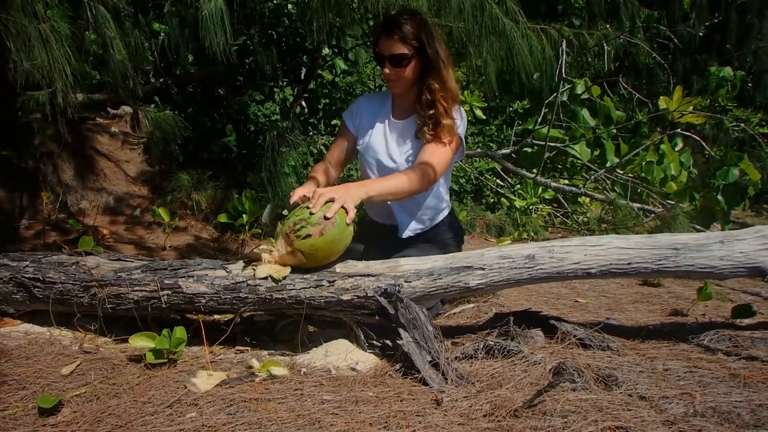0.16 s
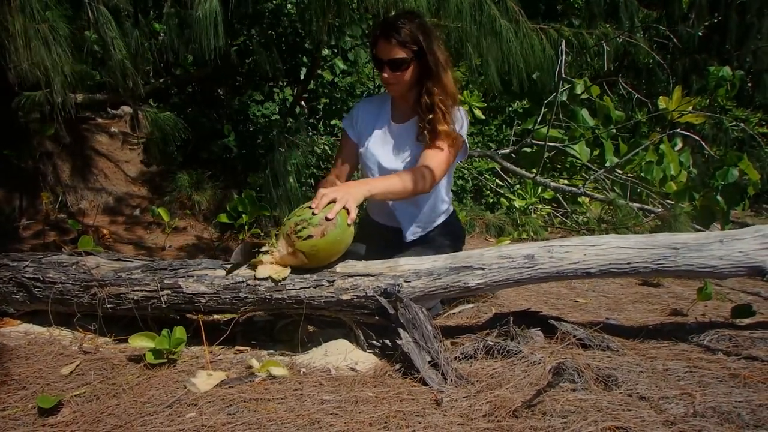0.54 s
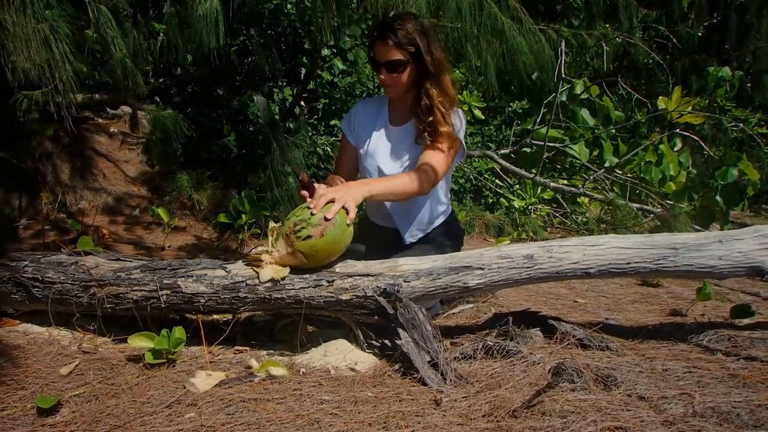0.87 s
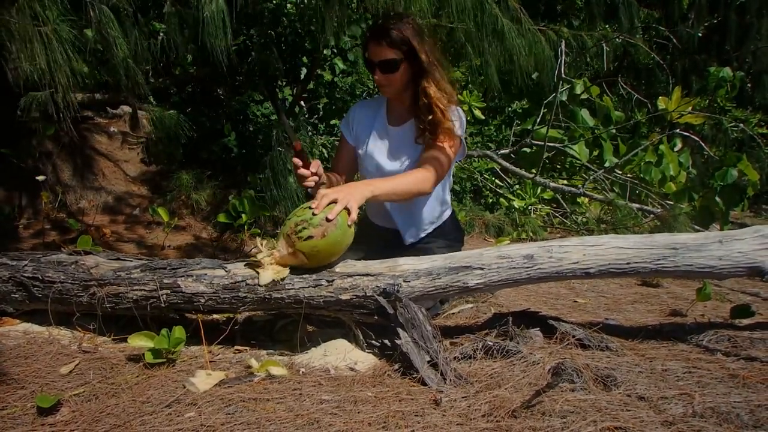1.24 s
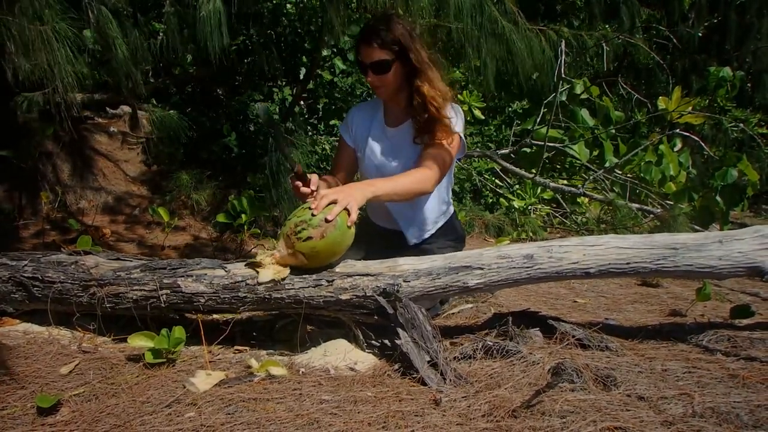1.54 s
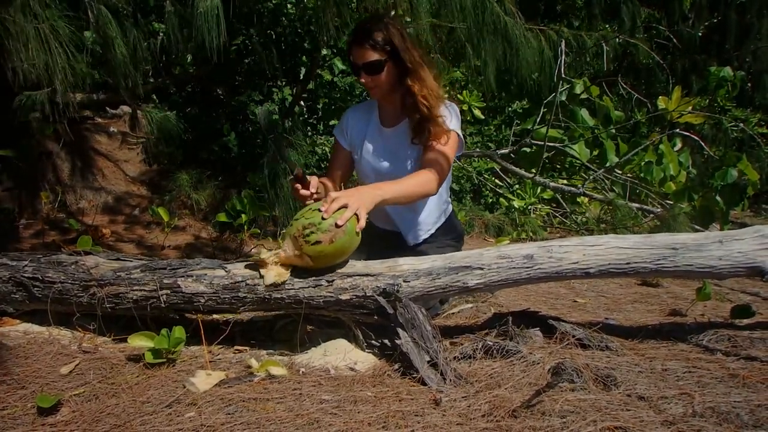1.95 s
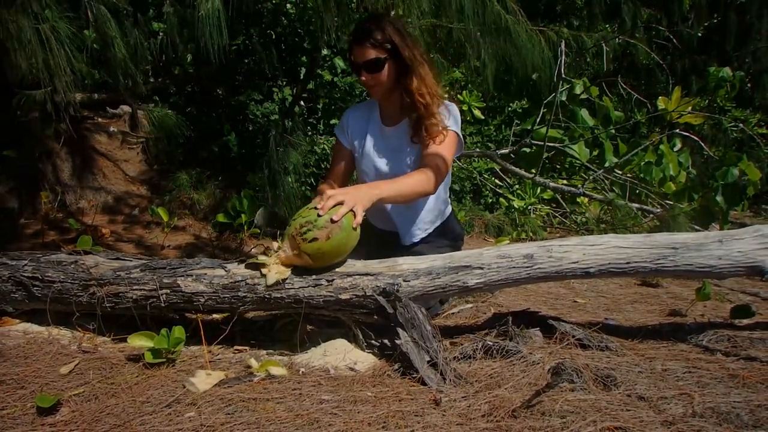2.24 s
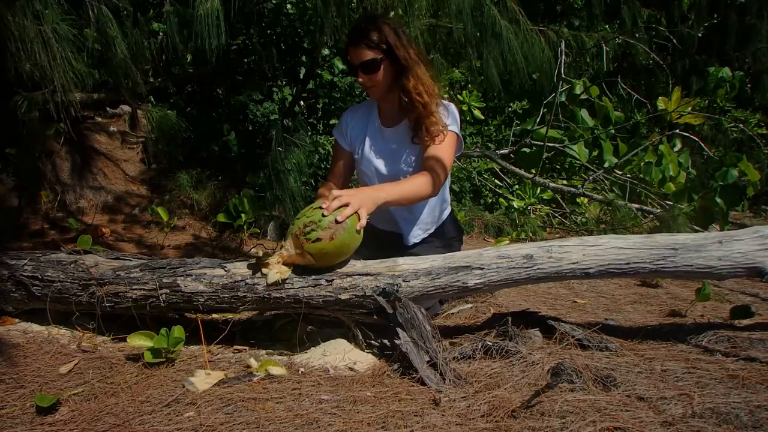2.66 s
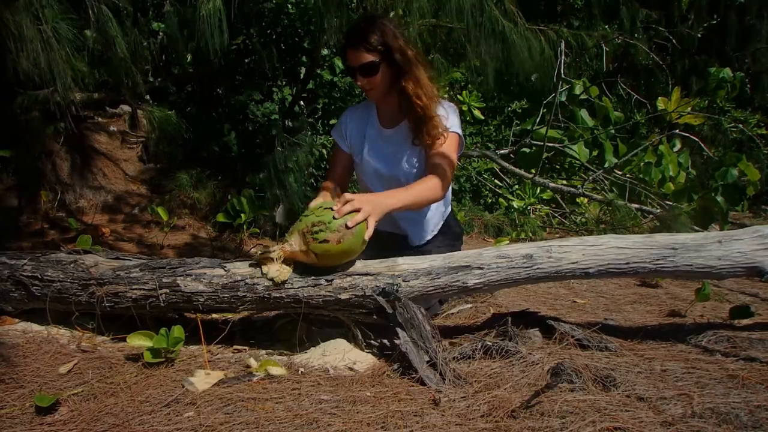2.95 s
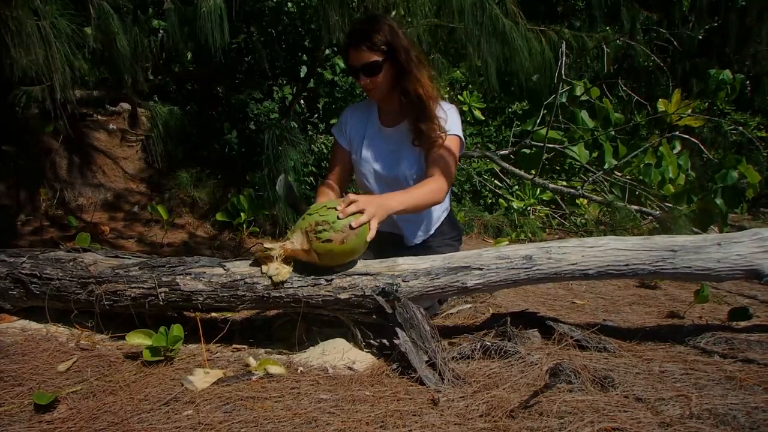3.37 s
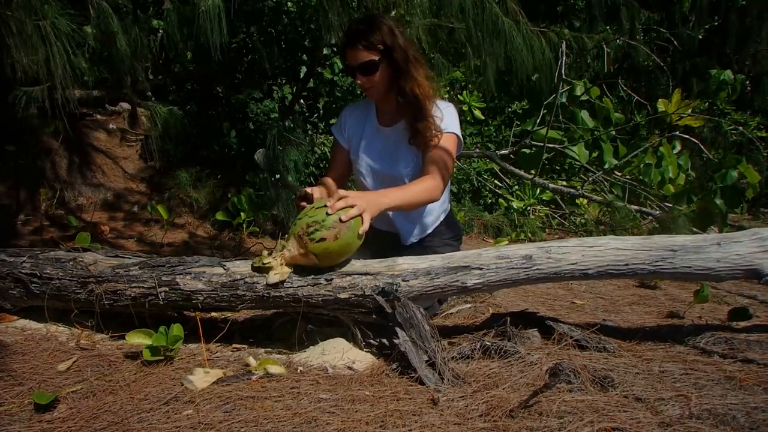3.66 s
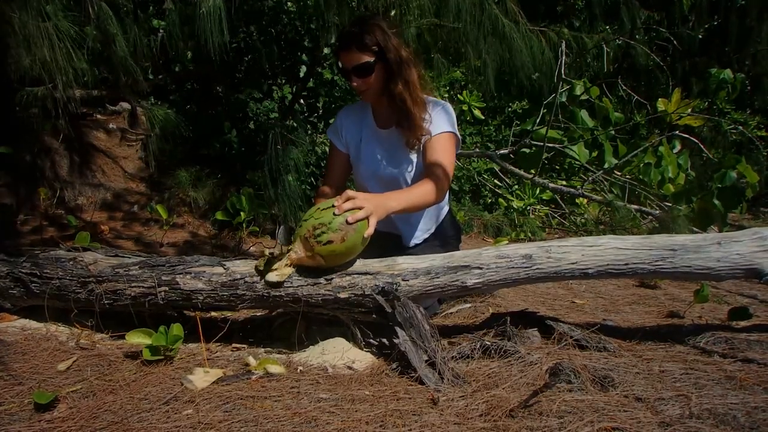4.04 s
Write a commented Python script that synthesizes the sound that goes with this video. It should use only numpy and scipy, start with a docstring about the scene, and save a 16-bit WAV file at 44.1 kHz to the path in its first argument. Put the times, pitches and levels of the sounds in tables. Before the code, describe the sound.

A blade chops the husk of a green coconut lying on a log, a few metres away and slightly right of centre, outdoors on a beach. Each blow is a short woody knock joined to a wet crackle of tearing fibres and a brief high hiss of juice. Seven blows fall at about 0.05, 0.6, 1.0, 1.4, 1.8, 2.2 and 2.6 seconds, the one at 1.0 strongest and juiciest. In the pause that follows, a separate sharp tick sounds at 3.2 seconds. Two more firm chops land at 3.5 and 4.0 seconds. Throughout, distant surf makes a soft, wide wash that dips after each blow and creeps back, with a faint, steady, high insect chorus. Wind buffets the microphone with low, uneven rumbles and soft thumps, most noticeably around 0.6, 1.3 and 3.2 seconds.

```python
"""A blade chops the husk of a green coconut lying on a log, a few metres from a camera on a beach.
From the start, surf washes and insects sing far off while wind buffets the two microphones.
Seven blows fall in the first 2.6 s; each knocks the nut, rips wet fibres and lets juice hiss out.
A separate sharp tick sounds in the pause, at 3.24 s; two more blows follow at 3.5 and 4.0 s.
The camera notches five narrow bands throughout; its gain control ducks the surf after each blow."""
import sys
import numpy as np
from scipy import signal
from scipy.io import wavfile
from scipy.ndimage import uniform_filter1d

SR = 44100
rng = np.random.default_rng(int(sys.argv[2]) if len(sys.argv) > 2 else 0)


def inscribe(sig):
    """Save sig as 16-bit PCM at rate SR to the path in sys.argv[1].

    A 1-D sig is mono; a 2-D sig holds one channel per row.
    Samples are clipped to [-1, 1] before scaling.
    """
    pcm = np.round(np.clip(np.atleast_2d(sig).T, -1, 1) * 32767)
    wavfile.write(sys.argv[1], SR, pcm.astype(np.int16))


N = 185301
BINS_HZ = np.fft.rfftfreq(4096, 1 / SR)
TOP_HZ, CUTOFF_HZ = 15750, 16600


def gain_of(db):
    """Decibels to amplitude factor."""
    return 10 ** (np.asarray(db) / 20)


def unit_rms(x):
    """Scale to rms 1."""
    return x / np.sqrt(np.mean(x ** 2) + 1e-20)


def curve_at(points, hz):
    """Interpolate a table over log frequency."""
    points_hz, values = np.transpose(points)
    return np.interp(np.log(hz + 1), np.log(points_hz + 1), values)


def add(mix, start_s, sound):
    """Mix a sound in at start_s."""
    part = mix[..., round(start_s * SR):][..., :sound.shape[-1]]
    part += sound[..., :part.shape[-1]]


def pan_gains(pan_db):
    """Channel gains; pan is left minus right."""
    return gain_of(np.array([pan_db / 2, -pan_db / 2]))


def min_phase(db):
    """Minimum-phase impulse response for gains on BINS_HZ."""
    log_gain = np.log(gain_of(np.maximum(np.r_[db, db[-2:0:-1]], -100)))
    return np.fft.ifft(np.exp(np.conj(signal.hilbert(log_gain)))).real[:2048]


def tinted(x, db):
    """Colour x with a unit-energy filter."""
    colour = min_phase(db)
    return signal.oaconvolve(x, colour / np.linalg.norm(colour))[:len(x)]


def wander(shape, samples):
    """Smooth random drift, rms 1."""
    return unit_rms(uniform_filter1d(uniform_filter1d(rng.standard_normal(shape), samples), samples))


def stereo_noise(shape_db, correlation, patchy_db, size=1024):
    """Shaped noise with drifting spectral patches, rms 1; correlation is a number or a table."""
    frames, hz = 4 * N // size + 5, np.fft.rfftfreq(size, 1 / SR)
    left_re, left_im, other_re, other_im, patches = rng.standard_normal((frames, len(hz), 5)).T
    patches = unit_rms(uniform_filter1d(uniform_filter1d(patches, 9, axis=0), 9, axis=1))
    shared = correlation if np.isscalar(correlation) else curve_at(correlation, hz)[:, None]
    left, other = left_re + 1j * left_im, other_re + 1j * other_im
    spectra = np.array([left, shared * left + np.sqrt(1 - shared ** 2) * other])
    spectra *= gain_of(shape_db(hz)[..., None] + patchy_db * patches)
    return unit_rms(signal.istft(spectra, nperseg=size, noverlap=3 * size // 4)[1][:, :N])


def insects(centre_hz=3230, width_hz=260, level_db=-65.5):
    """Far chorus: a steady narrow band of noise."""
    def band_db(hz):
        return -6 * (2 * (hz - centre_hz) / width_hz) ** 4
    return gain_of(level_db) * stereo_noise(band_db, correlation=0.58, patchy_db=1.8)


# Surf spectrum: (frequency [Hz], density [dB])
SURF_SPECTRUM = [(24, -46), (40, -30), (96, -2.5), (179, -10), (248, -11.5), (352, -2.5), (691, -3.5),
                 (1580, -7.5), (3020, -10.5), (3250, -15.5), (3970, -16), (8200, -18.5), (15700, -34)]
# Surf left-right likeness: (frequency [Hz], correlation [ratio])
SURF_CORRELATION = [(60, 0.11), (130, 0.069), (290, 0.93), (640, 0.94), (1410, 0.91), (3100, 0.85),
                    (6820, 0.46), (15000, 0.21)]
# Surf balance: (frequency [Hz], pan [dB])
SURF_PAN = [(100, 1), (700, -1.5), (4400, -0.5), (8000, 1.5), (15000, -0.7)]
# Surf swell: (time [s], level [dB])
SURF_SWELL = [(0, -40), (.3, -39.5), (.6, -42.5), (.9, -45), (1.199, -43.5), (1.5, -42.5), (1.8, -44),
              (2.1, -46.5), (2.4, -46.5), (2.7, -43.5), (3.0, -43), (3.3, -45), (3.602, -42.5),
              (3.9, -42.5), (4.2, -43.5)]


def surf():
    """Far, wide wash that swells slowly."""
    def shape_db(hz):
        pan_db = np.outer([.5, -.5], curve_at(SURF_PAN, hz))
        treble_bump_db = 6.8 * (abs(hz - 12800) < 120)
        return curve_at(SURF_SPECTRUM, hz) + pan_db + treble_bump_db - 90 * (hz > TOP_HZ)
    wash = stereo_noise(shape_db, SURF_CORRELATION, patchy_db=1.95)
    return wash * gain_of(np.interp(np.arange(N) / SR, *np.transpose(SURF_SWELL)))


# Turbulence spectrum: (frequency [Hz], density [dB])
WIND_SPECTRUM = [(30, -31), (70, -18.5), (140, 3), (250, -1), (450, -7), (900, -21), (3000, -44)]
# Gust envelope: (time [s], level [dB])
WIND_GUSTS = [(0.0, -46.5), (0.15, -53), (0.2, -42), (0.42, -44.5), (0.55, -44.5), (0.63, -46),
              (0.82, -41.5), (1.02, -54), (1.1, -42), (1.18, -49.5), (1.33, -38.5), (1.48, -41.5),
              (1.53, -54), (1.79, -40.5), (1.83, -55.5), (2.45, -51.5), (2.67, -48), (2.71, -41),
              (2.8, -40.5), (2.84, -53), (3.08, -56), (3.141, -35.5), (3.18, -36.5), (3.29, -46),
              (3.45, -41), (3.61, -48), (3.85, -49.5), (4.0, -57.5), (4.2, -64)]
# Single eddies: (centre time [s], level [dB], frequency [Hz], pan [dB])
WIND_EDDIES = [(0.206, -32, 206, -32), (.392, -32, 264, -25), (0.48, -42, 218, 9), (0.488, -34.5, 206, -27),
               (.543, -36.5, 250, 17), (0.584, -27, 250, 4), (0.645, -27, 283, 4), (0.743, -35, 199, 11),
               (0.782, -30, 325, 15), (1.091, -35, 160, -4), (1.301, -23, 326, -6), (1.324, -38, 340, 16),
               (1.354, -29.5, 274, -21.5), (1.36, -22, 264, -1), (1.479, -28.5, 265, -13),
               (2.753, -32, 220, -20), (2.790, -28, 199, -12), (3.143, -25.5, 348, 15),
               (3.151, -27.5, 187, 2), (3.152, -26, 265, 1), (3.213, -25, 267, -10),
               (3.328, -36.5, 253, -21), (3.412, -39, 230, 22)]


def wind(mean_pan_db=-3, veer_db=7, lump_db=3.87):
    """Turbulence on the microphones: lumpy rumble and soft thumps of single eddies."""
    balance = pan_gains(mean_pan_db + veer_db * wander(N, samples=2500))
    gust_db = np.interp(np.arange(N) / SR, *np.transpose(WIND_GUSTS))
    envelope = gain_of(gust_db + lump_db * wander((2, N), samples=500))
    rumble = stereo_noise(lambda hz: curve_at(WIND_SPECTRUM, hz), correlation=0.55, patchy_db=2.2)
    out = rumble * envelope * balance
    for centre_s, level_db, hz, pan_db in WIND_EDDIES:
        cycles = np.arange(0, 2.2, hz / SR)
        thump = gain_of(level_db) * np.sin(2 * np.pi * cycles) * np.hanning(len(cycles))
        add(out, centre_s - len(cycles) / 2 / SR, np.outer(pan_gains(pan_db), thump))
    return out


# Juice hiss spectrum: (frequency [Hz], density [dB])
JUICE_SPECTRUM = [(2000, -8), (5000, -8), (8300, -3.5), (10500, -12), (15500, -42)]


def spray(level_db, rise_s=0.00097, t60_s=0.24):
    """Juice leaves the cut with a smooth high hiss."""
    t = np.arange(9000) / SR
    hiss = tinted(rng.standard_normal(len(t)), curve_at(JUICE_SPECTRUM, BINS_HZ))
    return gain_of(level_db - 60 * t / t60_s) * (1 - np.exp(-t / rise_s)) * hiss


# Fibre snap spectrum: (frequency [Hz], density [dB])
FIBRE_SPECTRUM = [(180, -40), (300, -3.5), (1000, 3), (1380, 2), (1830, 0), (3530, -1.5), (5640, -2),
                  (10500, -11), (15200, -33), (16500, -40)]


def rip(level_db, rise_ms, t60_s, tilt_db_per_oct, crest_factor=3):
    """Wet fibres of uneven size snap: a dense crackle swells, darkens and dies."""
    t = np.arange(6000) / SR
    snaps = rng.standard_normal(len(t)) * gain_of(3.3 * np.minimum(rng.exponential(1, len(t)), 4))
    envelope = (1 - np.exp(-1000 * t / rise_ms)) * gain_of(-60 * t / t60_s)
    envelope /= envelope.max()
    colour_db = curve_at(FIBRE_SPECTRUM, BINS_HZ) + tilt_db_per_oct * np.log2((BINS_HZ + 200) / 4000)
    crackle = tinted(unit_rms(snaps) * envelope, colour_db)
    dull = uniform_filter1d(crackle, size=3)
    sound = dull + (crackle - dull) * 3.07 * gain_of(-25 * t / t60_s)  # finest snaps stop first
    sound *= np.linalg.norm(envelope) / np.linalg.norm(sound)  # rms near 1 at the envelope's top
    return gain_of(level_db) * sound / crest_factor


# Modes of nut and log: (frequency [Hz], level [dB], base t60 [s])
NUT_MODES = [(261, 3.5, 0.12), (506.4, 2, 0.059), (884, -9.5, 0.075), (1011.6, 0.1, 0.034),
             (1222, -3, 0.02), (1440, -30, 0.028), (1892, -0.5, 0.034), (2274, -5, 0.048),
             (3520, -1, 0.016), (3790, 3.5, 0.019), (4010, -13, 0.046), (5800, -7, .025)]


def knock(level_db, spot_hz, falloff_db, ring_scale, contact_cycles=0.24, feed_cycles=0.66):
    """The blade's half-sine push rings the modes; the struck spot favours those near spot_hz."""
    t = np.arange(4000) / SR
    ring = np.zeros(len(t))
    for hz, mode_db, t60_s in NUT_MODES:
        loss_db = min(falloff_db * np.log2(hz / spot_hz) ** 2, 20.5)
        ring += gain_of(mode_db - loss_db - 60 * t / (t60_s * ring_scale)) * np.sin(2 * np.pi * hz * t)
    ring *= 1 - 0.91 * np.exp(-t * spot_hz / feed_cycles)  # the wedging blade feeds the ring
    ring[0] = 1.0  # direct blade contact
    push = np.sin(np.pi * np.clip(t[:100] * spot_hz / contact_cycles, 0, 1))
    sound = np.convolve(np.diff(push, prepend=0), ring)[:len(t)]  # the change of force radiates
    return -gain_of(level_db) * sound / abs(sound).max()  # pressure drops first


# Scatter off the camera body: (frequency [Hz], side re mid [dB])
SCATTER_SPECTRUM = [(500, -26), (3000, -14.5), (5500, -14), (8500, -6.5), (13000, -0.5)]


def body_scatter(mid):
    """The camera body scatters treble unevenly to the two microphones, anew for each sound."""
    echoes = rng.standard_normal(300) * np.exp(-np.arange(300) / 210)
    response = np.convolve(echoes / np.linalg.norm(echoes), min_phase(curve_at(SCATTER_SPECTRUM, BINS_HZ)))
    side = signal.oaconvolve(mid, response)[:len(mid)]
    return mid + np.outer([1, -1], side)


# Blows on the nut, and one separate sharp tick at 3.24 s:
# (time [s], level [dB], spot frequency [Hz], falloff [dB/oct^2], ring scale [ratio])
IMPACTS = [(.0447, -14.5, 760, 7.5, 0.4), (.0520, -18, 910, 2, 0.34), (.5640, -13, 930, 9.5, 0.76),
           (.9781, -10, 724, 3.5, 0.42), (.9996, -6, 1770, 42, 0.33), (1.3933, -12.5, 910, 6.5, 0.65),
           (1.4100, -19, 1030, 11, 0.85), (1.7812, -10.5, 803, 10, 0.4), (2.1826, -16, 715, 6, 0.44),
           (2.1968, -25.5, 1080, 20, 0.8), (2.2455, -26.5, 1680, 8, 0.31), (2.5827, -11.5, 1134, 43, 0.89),
           (3.2398, -10, 4180, 5, 0.33), (3.4588, -9, 1135, 21, 0.75), (4.0055, -9, 2080, 23, 0.72),
           (4.0062, -16.5, 646, 9, 0.45)]
# Husk tearing, and the tick's brief crackle: (time [s], level [dB], rise [ms], t60 [s], tilt [dB/oct])
CRACKLES = [(.0447, -12, .4, 0.051, 5.5), (.0510, -8, 1.3, 0.052, 0.6), (.0615, -16, 1.2, 0.054, 0.5),
            (.5634, -8, 2.1, 0.023, 1.5), (.5720, -25, 1.2, 0.051, 6), (.9785, -19, 0.48, 0.046, -0.5),
            (.9830, -19, .6, 0.02, 4), (.9900, -10, 6.1, 0.057, -0.8), (.9996, -7, 0.18, 0.033, 0.8),
            (1.3933, -16, 0.21, 0.039, -0.5), (1.3975, -16, 2.3, 0.093, 3.5), (1.4105, -23, 1.1, 0.1, -2.5),
            (1.7812, -18.5, 2.9, 0.039, -0.5), (1.7865, -7, 0.1, 0.044, -0.4), (2.1845, -15, 1.2, 0.031, 1),
            (2.1962, -12, 2.3, 0.027, -1), (2.2078, -21, 1.6, 0.047, 1), (2.5827, -10, 0.16, 0.048, -3.5),
            (3.2398, -15.5, 0.33, 0.015, -1), (3.4588, -10.5, 0.31, 0.059, -2),
            (4.0053, -10, .4, 0.038, -0.1), (4.0058, -14.5, 0.12, 0.009, 7), (4.0156, -25, 1.5, 0.11, -2.5)]
# Juice spurts: (time [s], level [dB])
JUICE_SPRAYS = [(.065, -33), (.575, -34.5), (1.005, -28), (1.42, -40), (1.795, -42.5), (2.215, -41),
                (2.595, -40), (3.475, -39), (4.015, -35.5)]
# Balance of chops and tick: (frequency [Hz], pan [dB])
CHOP_PAN = [(1000, -2), (3000, -1), (5500, -0.2), (8500, 1), (13000, -3)]


def chops_and_tick():
    """Each chop's knock, rip and spray, plus the separate tick, slightly to the right."""
    out = np.zeros((2, N))
    for events, source in ((IMPACTS, knock), (CRACKLES, rip), (JUICE_SPRAYS, spray)):
        for start_s, *settings in events:
            add(out, start_s, body_scatter(source(*settings)))
    pan_db = curve_at(CHOP_PAN, BINS_HZ)
    return signal.oaconvolve(out, [min_phase(pan_db / 2), min_phase(-pan_db / 2)], axes=1)[:, :N]


def scene():
    """Everything that reaches the two microphones."""
    return chops_and_tick() + surf() + insects() + wind()


def notches(x, spacing_hz=1024.5, width_hz=110):
    """The camera cuts five narrow bands, each to 15% amplitude."""
    for hz in spacing_hz * np.arange(2, 7):
        notched = signal.lfilter(*signal.iirnotch(hz, hz / width_hz, SR), x)
        x = .85 * notched + .15 * x
    return x


def gain_control(x, threshold_db=-34, slope=0.62, attack_s=.015, makeup_db=3.5):
    """A peak-holding level detector pulls the gain down fast and lets it back slowly."""
    power = signal.lfilter([.004], [1, -.996], (x ** 2).mean(0))
    power_db = 10 * np.log10(power + 1e-12)
    power_db[0] = -27  # starts partly ducked
    fall_db = 19.9 * np.arange(N) / SR
    held_db = np.maximum.accumulate(power_db + fall_db) - fall_db
    over_db = np.maximum(held_db - threshold_db, 0)
    step = 1 / (attack_s * SR)
    smooth_db, _ = signal.lfilter([step], [1, step - 1], over_db, zi=[over_db[0]])
    return x * gain_of(makeup_db - slope * smooth_db)


# Microphone housing dip and resonances: (frequency [Hz], width [Hz], gain [dB])
HOUSING_BANDS = [(2886, 330, -5), (3223, 200, 8.5), (5610, 360, 5)]


def record(dry, hiss_db=-69.5):
    """Camera chain: housing colour, top shelf, notches, gain control, converter hiss, low-pass."""
    housing_db = sum(db / (1 + (2 * (BINS_HZ - hz) / width_hz) ** 2) for hz, width_hz, db in HOUSING_BANDS)
    colour = min_phase(housing_db - 17 * (BINS_HZ > TOP_HZ))
    coloured = signal.oaconvolve(dry, colour[None], axes=1)[:, :N]
    ducked = gain_control(notches(coloured))
    hiss = stereo_noise(lambda hz: 6 * np.log2(hz + 50) - 120 * (hz > TOP_HZ),
                        correlation=.2, patchy_db=.3, size=512)
    lowpass = signal.firwin(511, CUTOFF_HZ, window=("kaiser", 9), fs=SR)
    return signal.oaconvolve(ducked + gain_of(hiss_db) * hiss, lowpass[None], "same")


dry = scene()
out = record(dry)
inscribe(out)
```